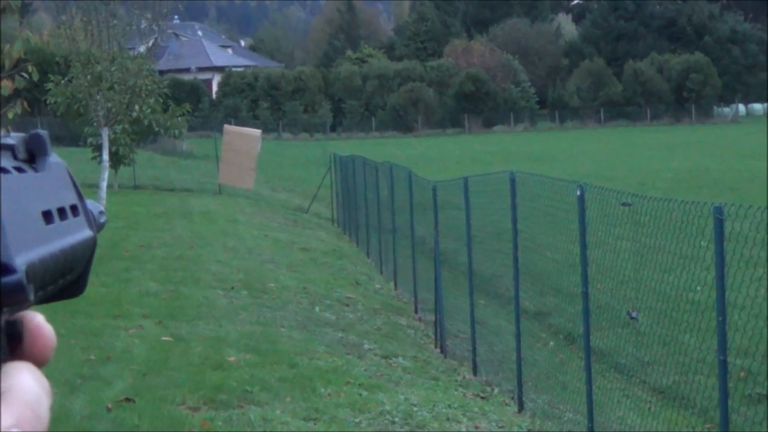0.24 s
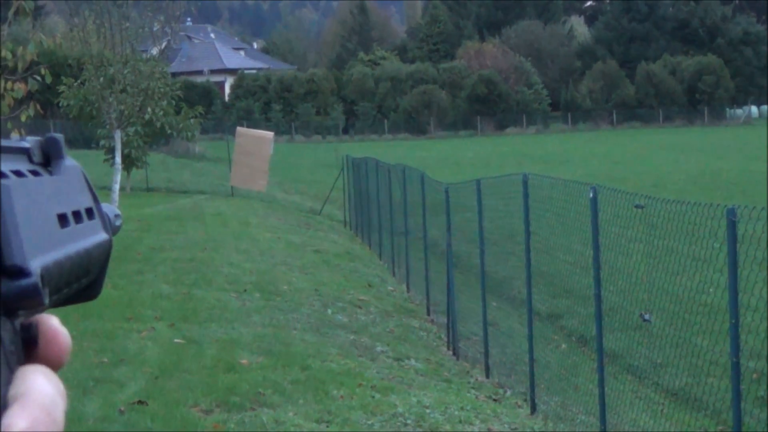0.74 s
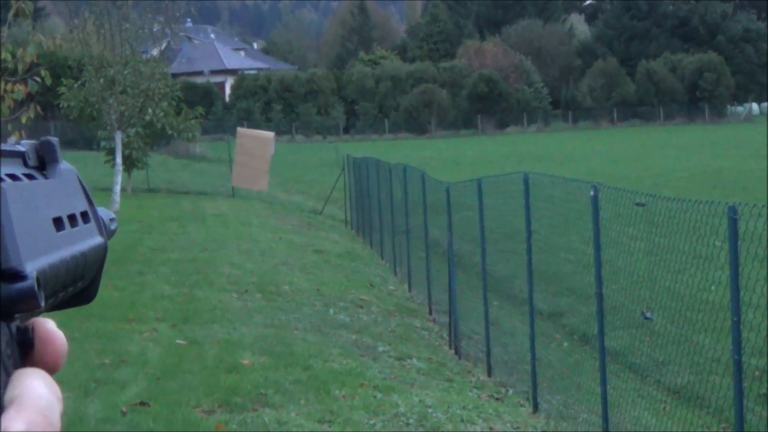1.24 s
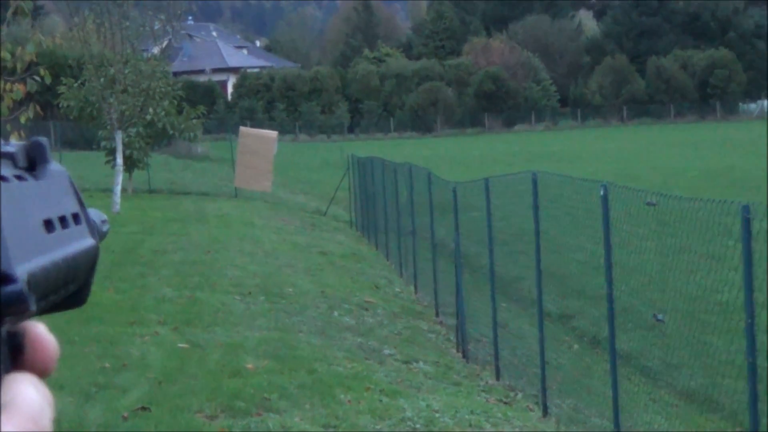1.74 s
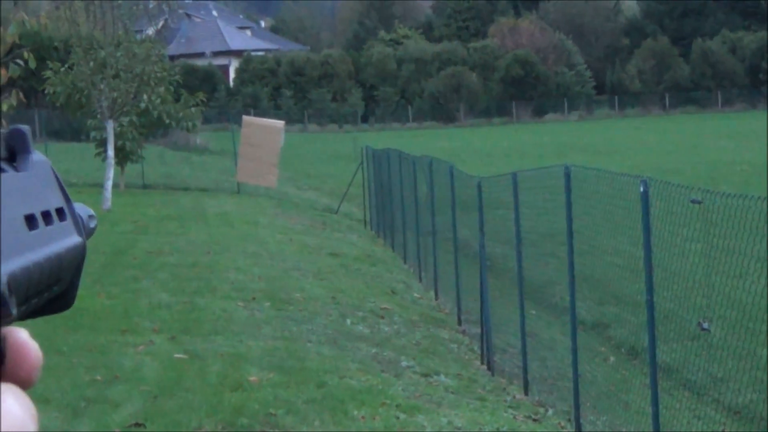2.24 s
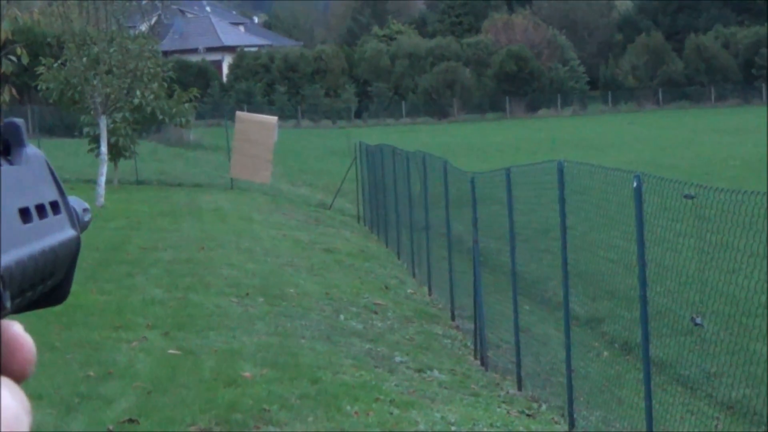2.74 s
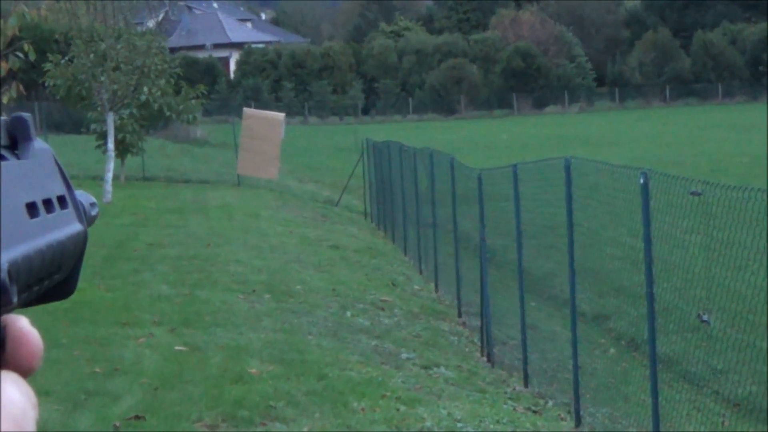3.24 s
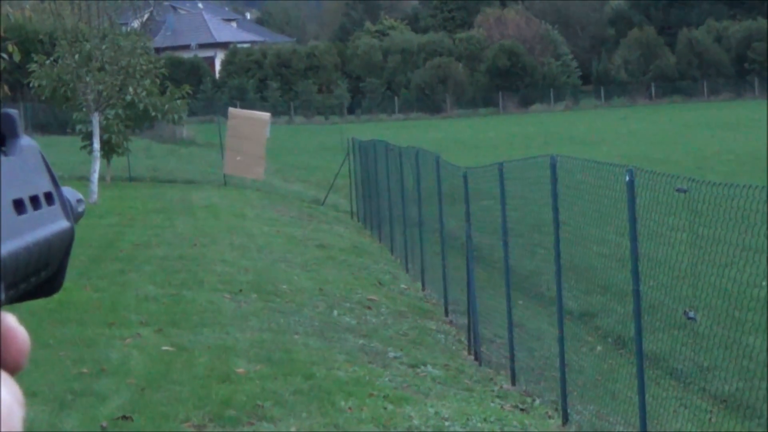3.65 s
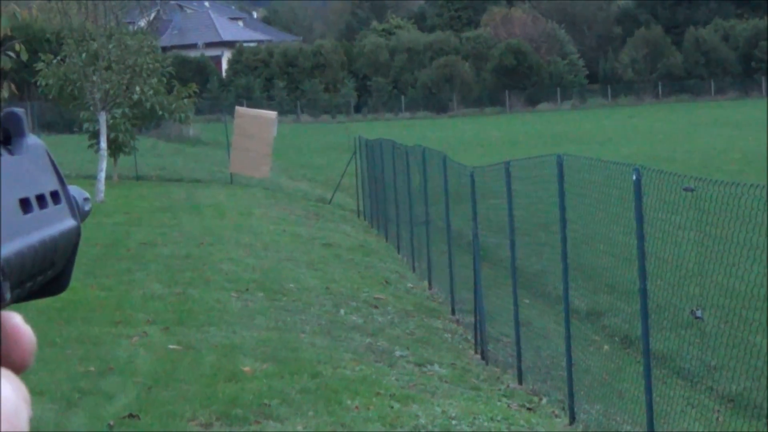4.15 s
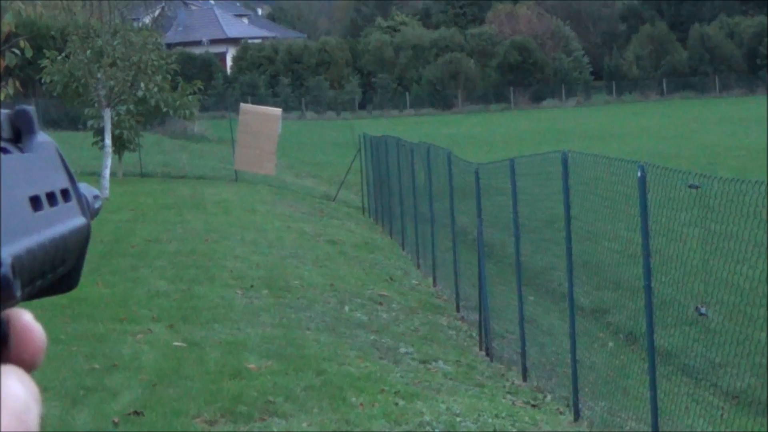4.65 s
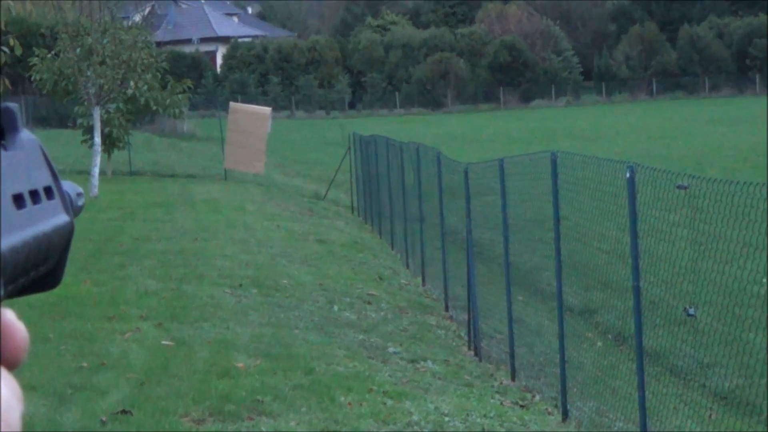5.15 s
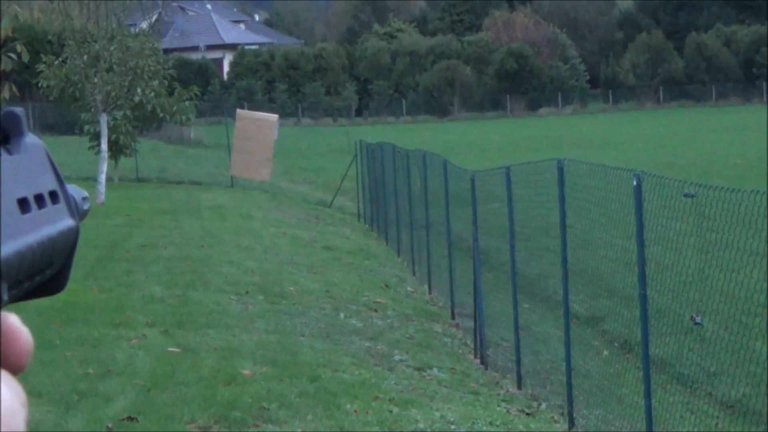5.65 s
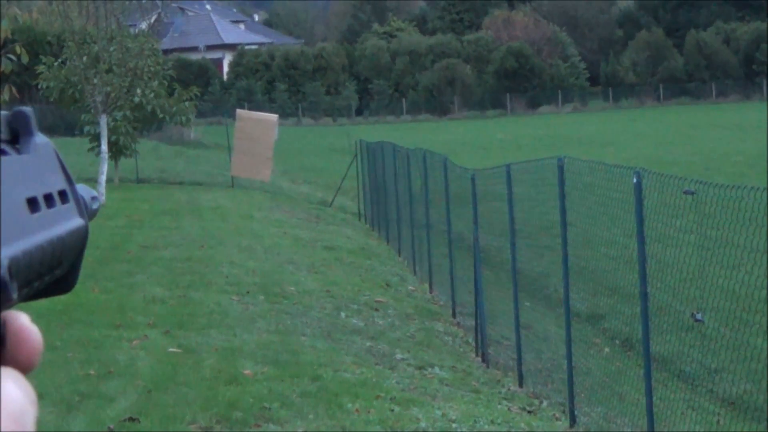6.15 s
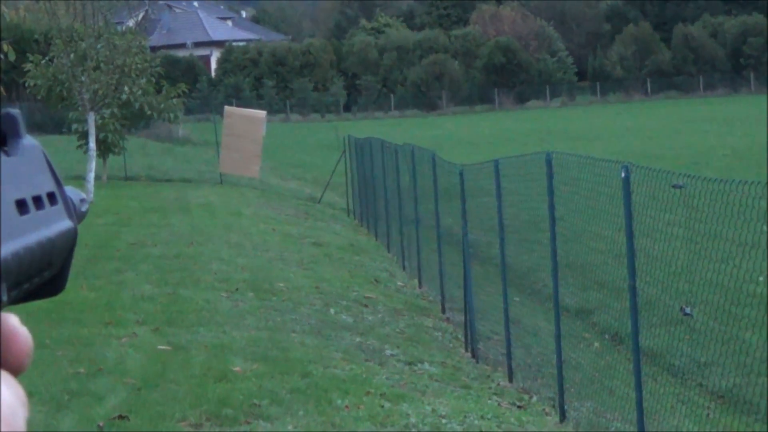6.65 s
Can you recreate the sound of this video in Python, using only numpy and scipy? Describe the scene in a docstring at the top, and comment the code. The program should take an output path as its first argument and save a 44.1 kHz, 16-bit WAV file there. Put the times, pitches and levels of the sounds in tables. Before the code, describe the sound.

Close stereo pickup with the gun louder on the left: two isolated airsoft shots, then a brisk run of separately triggered ones. A tiny motor whirs up, the piston slams dry and sharp, the spring hums briefly and the gears rattle to a stop with small metallic ticks. Soft far traffic surrounds it, dipping after loud shots; fence and ground add only a faint tail.

```python
"""Far traffic hums on an open lawn, with two faint steady electronic tones; a trigger clicks.
An electric airsoft gun, close on the left, fires two lone shots, then a quick series, with clicks between.
Each shot: the motor winds up and its gears whine, the piston is let go and slams, its spring hums,
and the train rattles to a halt, with a latch tick after some shots; fence and ground add a faint tail.
The recorder turns its gain down after loud sounds and slowly lets it rise again."""
import sys
import numpy as np
from scipy import signal
from scipy.fft import rfft, irfft
from scipy.io import wavfile
from scipy.ndimage import uniform_filter1d

SR = 44100
rng = np.random.default_rng(int(sys.argv[2]) if len(sys.argv) > 2 else 0)


def store_pcm(level_fs):
    """Save levels as 16-bit WAV."""
    pcm = np.round(np.clip(level_fs, -1, 1) * 32767).astype(np.int16)
    wavfile.write(sys.argv[1], SR, np.atleast_2d(pcm).T)


N = 303849

# The shots. Each row: piston slam in seconds, strength in relative dB, wind-up stretch (factor),
# run-down stretch (factor), moment the slack is taken up in seconds before the slam.
SHOTS = [(0.8424, 5, 1.055, 0.98, 0.062), (1.9969, 4, 1.004, 1.1, 0.082), (2.9537, 3.5, 1.0, 1.09, 0.076),
         (3.2046, 3, 1.025, 1.02, 0.071), (3.4379, 3.5, 1.06, 1, 0.068), (3.6763, 4, 1.0, 1.03, 0.065),
         (3.9013, 3, 1.0, 1, 0.083), (4.1306, 2.5, 0.99, 1.05, 0.069), (4.348, 4, 1.027, 0.99, 0.061),
         (4.576, 4, 1.01, 0.96, .066), (4.8265, 3.5, 1.03, 0.92, .07), (5.1062, 3, 1.02, 0.99, 0.063),
         (5.3684, 3.5, 1.01, 1.01, 0.0704), (5.6105, 5, 0.99, 0.97, 0.067), (5.8338, 4, 1.02, 0.95, .068),
         (6.0573, 3.5, 1.05, 0.95, .068), (6.3018, 3, 1.053, 0.97, 0.069), (6.5443, 2, 0.97, 1.01, .068),
         (6.8026, 2.5, 1.026, 0.97, 0.072)]


def amp(db):
    """dB to gain."""
    return 10 ** (np.asarray(db) / 20)


def rms_one(x):
    """Scale to rms 1."""
    return x / np.sqrt(np.mean(x ** 2))


def at_hz(points):
    """Read a spectrum table at every FFT bin, along log frequency."""
    hz = np.maximum(np.fft.rfftfreq(N, 1 / SR), 1)
    table_hz, values = np.array(points).T
    return np.interp(np.log(hz), np.log(table_hz), values)


def humps(table):
    """Resonance humps in dB at every FFT bin."""
    hz = np.fft.rfftfreq(N, 1 / SR)
    return sum(db / (1 + (2 * (hz - centre) / width) ** 2) for centre, width, db in table)


def colour(x, gain):
    """Filter by a gain per FFT bin."""
    return irfft(rfft(x) * gain, N)


def drift(rate_hz):
    """Slow chance, rms 1: noise through two equal low-pass poles, settled for a second first."""
    r = np.exp(-2 * np.pi * rate_hz / SR)
    noise = rng.standard_normal(N + SR)
    return rms_one(signal.lfilter([1], [1, -2 * r, r * r], noise)[SR:])


def ring(clicks, hz, t60):
    """A unit click sets off a decaying sine of starting height 1."""
    r, w = amp(-60 / (t60 * SR)), 2 * np.pi * hz / SR
    return signal.lfilter([0, np.sin(w)], [1, -2 * r * np.cos(w), r * r], clicks + 1e-18)


def traffic():
    """Far road hum: smooth noise, more alike in both channels in the bass than the mids, gently patchy."""
    # Each row: Hz, dB per Hz (relative).
    hum_spectrum = [(15, -76), (25, -50), (77, -20), (131, -24), (224, -23), (293, -15), (373, -15.5),
                    (427, -13), (673, -7), (833, -5), (2000, -17), (3200, -24), (5570, -36), (11800, -40.5),
                    (15000, -43)]
    # Resonances in the hum. Each row: centre in Hz, width in Hz, height in dB.
    hum_humps = [(460, 210, 4), (1026, 420, 5.5), (1520, 180, 3.5), (2110, 220, 5), (15500, 300, 22)]
    # Each row: Hz, left-right likeness (0 to 1).
    likeness = [(60, 0.92), (180, 0.92), (550, 0.9), (1650, 0.6), (4970, 0.65), (15000, 1)]
    # Swell of the road before its flutter. Each row: seconds, level of the mid part in dB rms.
    swell = [(0, -35), (.7, -33.5), (1.3, -31.5), (1.901, -30.5), (2.5, -34), (3, -32.5), (5, -35),
             (6.9, -36.5)]
    alike = np.clip(at_hz(likeness), 0, 1)
    gain = amp(at_hz(hum_spectrum) + humps(hum_humps))
    mid = colour(rng.standard_normal(N), gain * np.sqrt(1 + alike))
    side = colour(rng.standard_normal(N), gain * np.sqrt(1 - alike))
    level_db = np.interp(np.arange(N) / SR, *np.transpose(swell)) + 0.8 * drift(6.0)
    return amp(level_db) * np.array([mid + side, mid - side]) / np.std(mid)


def latch():
    """Dry steel ticks as the gears coast: a click and a softer second one 0.7 ms later ring the metal."""
    # Each row: start in seconds, click height in relative dB, ring in Hz.
    ticks = [(0.9095, 3, 8100), (2.0404, -20, 3180), (2.0862, -4, 8800), (3.5095, -6, 8740),
             (4.643, 1, 7940), (5.1796, 3.5, 7600), (5.435, 2, 7160), (5.672, 6, 8010), (5.8855, 2, 8110),
             (6.111, 4.5, 7990), (6.3603, 1, 8000), (6.6116, 3.5, 8410)]
    out = np.zeros(N)
    for s, peak_db, hz in ticks:
        tick = np.zeros(2000)
        tick[[0, 30]] = amp(peak_db), amp(peak_db - 9)
        out[round(s * SR):][:len(tick)] += ring(tick, hz, 0.0014)
    return out


def trigger():
    """Each click builds up as a short scrape, snaps and rattles out, in three parts of the spectrum."""
    # Each row: time in seconds (the snap comes 0.98 ms later), level in relative dB, brightness in dB.
    clicks = [(0.538, -17, 11), (0.9293, -14.5, 8), (0.952, -10.5, 1), (0.9636, -25, 3), (1.712, -14, 5),
              (1.8894, -39, -12), (2.101, -9.5, -2.5), (2.1201, -22, 6), (2.158, -27, 5), (3.0745, -7, -1),
              (3.3315, -6.5, -1), (3.5734, -4.5, -1.5), (3.8153, -6.5, 1), (4.0191, -10, 1.5),
              (4.246, -9, 2), (4.4763, -7, 4), (4.7045, -5, 0.5), (4.9433, -9.5, 21), (4.968, -6.5, -3),
              (4.996, -16.5, 6), (5.2204, -7, 1.5), (5.4856, -7, 3), (5.7304, -6, 0), (5.9465, -22, 11),
              (5.963, -6, 2), (6.1946, -5.5, -0.5), (6.4201, -9.5, -1), (6.6533, -11.5, -3),
              (6.671, -20.5, 9)]
    # Each row: low edge in Hz, high edge in Hz, gain in dB, share of the brightness (factor),
    # rise in dB per ms, snap t60 in seconds, after-rattle in dB, after-rattle t60 in seconds.
    click_bands = [(442, 1130, 8.5, -0.52, 5, 0.018, -7, 0.052),
                   (1310, 3120, 5, 0.075, 6.5, 0.0076, -12, 0.066),
                   (4540, 10340, 1, 0.22, 7.5, 0.0023, -11.5, 0.034)]
    build_s = .005   # the lever scrapes this long before it snaps
    bounce_s, bounce_db = 0.0068, -5   # the lever knocks back once, dull: lowest band only
    crack_db = 7   # one hard contact at the snap, over the chatter
    t = np.arange(int(.08 * SR)) / SR - build_s   # seconds from the snap
    low_hz, high_hz, gain_db, share, rise_db, snap, tail_db, tail = np.transpose(click_bands)[:, :, None]
    scrape = amp(1000 * rise_db * np.minimum(t, 0))
    decay = amp(-60 * t / snap) + amp(tail_db - 60 * t / tail)
    fade = np.where(t < 0, scrape, decay)
    fade[0] += amp(bounce_db - 60 * np.abs(t - bounce_s) / snap[0])
    parts = np.zeros((3, N))
    for s, level_db, bright_db in clicks:
        at = round((s + 0.00098 - build_s) * SR)
        chatter = rng.standard_normal(fade.shape)
        chatter[:, np.argmax(t >= 0)] = -amp(crack_db)
        parts[:, at:at + len(t)] += chatter * fade * amp(level_db + gain_db + share * bright_db)
    edges = zip(low_hz[:, 0], high_hz[:, 0])
    bands = [signal.butter(2, edge, "band", fs=SR, output="sos") for edge in edges]
    return sum(signal.sosfilt(band, part + 1e-18) for band, part in zip(bands, parts))


def spring():
    """Every slam restarts the main spring's low modes; they are damped as the gears come to rest."""
    # Each row: mode in Hz, level in relative dB, t60 in seconds.
    modes = [(147, -30.5, 0.13), (285.2, -34.5, 0.26), (427.7, -25.5, 0.29)]
    start_s = -0.00403   # from the slam
    t = np.arange(int(.15 * SR)) / SR   # seconds from the start of the hum
    swell = np.minimum(t / 0.0073, 1)
    damped = np.clip((0.095 - t) / 0.011, 0, 1)
    out = np.zeros(N + SR)
    for slam, shot_db, *_ in SHOTS:
        hum = np.zeros(len(t))
        for hz, level_db, t60 in modes:
            mode_db = shot_db + level_db + 2.4 * rng.standard_normal() - 60 * t / t60
            hum += amp(mode_db) * np.sin(2 * np.pi * hz * t)
        out[round((slam + start_s) * SR):][:len(t)] += hum * swell * damped
    return out[:N]


def contacts():
    """The same chain of ringing blows around each slam; force and timing vary a little."""
    # Metal and plastic contacts in one cycle. Each row: seconds from the slam before stretching,
    # click height in dB before the shot strength, ring in Hz, t60 in seconds.
    blows = [(-.0805, -26.5, 7900, 0.0059), (-.0217, -16, 1490, 0.0068), (-.0197, -7.5, 1330, 0.0021),
             (-.0153, -22, 6900, 0.016), (-.0096, -4.5, 5570, 0.0018), (-.0055, -7, 4770, 0.0011),
             (-.0009, -5, 790, 0.0098), (-.0003, -3, 2630, 0.0023), (.0043, -7, 7200, 0.0017),
             (-.0152, -31, 10300, .002), (-.0095, -9, 9600, .0015), (-.0053, -24, 11000, .0015),
             (.0042, -30, 10600, 0.00087), (0.026, -36, 3960, 0.0056), (0.0279, -11, 620, .02),
             (0.03, -15.5, 866, 0.045), (.035, -14.5, 1301, 0.0093), (-.018, -39, 156, 0.11),
             (-.019, -18, 84, 0.051), (-.012, -27.5, 338, 0.088)]
    out, shots = np.zeros(N), np.array(SHOTS)
    for s, peak_db, hz, t60 in blows:
        # early blows follow the wind-up, late ones the run-down, those near the slam neither
        stretch = shots[:, 3] if s > .01 else shots[:, 2] if s < -.03 else 1
        timing, force = rng.standard_normal((2, len(shots)))
        at = np.round((shots[:, 0] + s * stretch + 0.00013 * timing) * SR).astype(int)
        inside = at < N
        clicks = np.zeros(N)
        clicks[at[inside]] = -amp(peak_db + shots[:, 1] + 0.5 * force)[inside]
        out += ring(clicks, hz, t60)
    return out


def cycle_time():
    """Seconds from the nearest slam, stretched per shot, and that shot's strength in dB."""
    slack_db, slack_s = -3.5, 0.0027   # softer until the slack is taken up, then full load within this time
    shots, t = np.array(SHOTS), np.arange(N) / SR
    k = np.searchsorted((shots[1:, 0] + shots[:-1, 0]) / 2, t)
    since = t - shots[k, 0]
    slack = np.clip(-(since + shots[k, 4]) / slack_s, 0, 1)
    stretch = np.where(since > 0, shots[k, 3], shots[k, 2])
    return since / stretch, shots[k, 1] + slack_db * slack


def whine(hz, orders, rough_db):
    """Teeth meeting at a tooth rate: partials that waver a little in pitch and strength."""
    phase = 2 * np.pi * np.cumsum(hz * (1 + .025 * drift(150.4))) / SR
    out = np.zeros(N)
    for multiple, db in orders:
        partial = np.sin(multiple * phase + rng.uniform(0, 2 * np.pi))
        out += amp(db + rough_db * drift(290)) * partial
    return out


def rattle(spectrum, per_s, spread_db):
    """Loose teeth knock at random, with uneven force, into two unrelated parts of the resonant shell."""
    # Shell resonances. Each row: centre in Hz, width in Hz, height in dB.
    shell = [(606, 82, 4.5), (830, 166, 7.5), (2380, 400, 6), (4110, 110, 0.5), (5750, 170, 3),
             (8650, 890, -1)]
    force_db = spread_db * np.minimum(rng.exponential(1, (2, N)), 4)
    force = amp(force_db) * rng.choice([-1, 1], (2, N))
    knocks = (rng.random((2, N)) < per_s / SR) * force
    return rms_one(colour(knocks, amp(at_hz(spectrum) + humps(shell))))


def gear_train():
    """Whine and rattle follow one cycle at every shot; returns the shared and the left-right differing sound."""
    # Gear speed over a cycle. Each row: seconds from the slam, rack and pinion tooth rates in Hz.
    speed = [(-.088, 449.4, 801), (-.076, 597, 1298), (-.058, 1054, 2393), (-.039, 1465, 2697),
             (-.022, 1547, 2750), (.0, 1700, 2689), (.026, 1400, 2632), (.055, 950, 1700),
             (.085, 799.3, 800), (.11, 762, 527.5)]
    # Rattle over a cycle, swelling at wind-up and at the rebound.
    # Each row: seconds from the slam, dull level in relative dB, bright level in relative dB.
    rattle_levels = [(-.084, -69, -58), (-.08, -24.5, -35.5), (-.068, -17.5, -30), (-.058, -17, -21.5),
                     (-.036, -19.5, -20), (-.017, -21, -17.5), (-.012, -20.5, -23), (.021, -23, -24),
                     (0.025, -19, -18), (0.048, -18.5, -20.5), (.07, -21.5, -28), (.085, -29.5, -35),
                     (.11, -44, -61)]
    # Rack whine partials. Each row: multiple of the tooth rate, level in relative dB.
    rack_orders = [(1, -0.6), (2, -13.5), (3, -13)]
    # Shell rattle. Each row: Hz, dB per Hz (relative).
    dull = [(35, -59), (60, -52), (211, -18), (411, -10), (600, -5), (815, -3), (1100, -2.5), (1500, -2),
            (1840, -5), (2430, -8), (5000, -16.5), (6500, -25), (11000, -120)]
    # Steel rattle. Each row: Hz, dB per Hz (relative).
    bright = [(1470, -31), (2500, -6.5), (2980, -6), (3950, -3), (5010, -15.5), (5620, -4.5), (6340, -8),
              (8810, -3.5), (10600, -7), (12000, -15.5), (13300, -13.5), (14600, -41.5), (15500, -21)]
    likeness = 0.93   # left-right likeness of the knocks

    since, shot_db = cycle_time()
    speed_s, *speeds = np.transpose(speed)
    rack_hz, pinion_hz = [np.interp(since, speed_s, rate) for rate in speeds]
    level_s, *levels = np.transpose(rattle_levels)
    dull_db, bright_db = [np.interp(since, level_s, level) for level in levels]
    start, end = level_s[0], level_s[-1]
    running = amp(shot_db) * (since > start) * (since < end)

    # the rack is fully loaded, slips off, idles, then bites again over a short while (s from slam)
    loaded, release, rebound, re_engage = -0.028, -0.02, 0.037, 0.059
    stages = [start, loaded, release - .002, release + 0.0016, rebound, rebound + re_engage]
    # whine in dB over the dull rattle at each stage; the rack's grows as the spring is squeezed
    rack_db = dull_db + np.interp(since, stages, [-11, 3.5, 3.5, -12, -12, -4])
    pinion_db = dull_db + np.interp(since, stages, [-9.5, -9.5, -9.5, -19, -19, -4.5])
    tones = amp(rack_db) * whine(rack_hz, rack_orders, 3.7)
    tones += amp(pinion_db) * whine(pinion_hz, [(0.99, 0)], 5.0)

    knocks = amp(dull_db + 2.05 * drift(49)) * rattle(dull, 7000, 2.75)
    knocks += amp(bright_db + 2.13 * drift(150)) * rattle(bright, 9000, 3.85)
    shared = running * (np.sqrt(2) * tones + np.sqrt(likeness) * knocks[0])
    return shared, running * np.sqrt(1 - likeness) * knocks[1]


def near_left(shared, differing):
    """Two microphones get the gun at other levels and phases; fence and ground return a short faint tail."""
    # Each row: Hz, left over right in dB.
    balance = [(60, 2), (130, 2), (290, 0), (640, 8), (1410, 8), (3100, 10), (6820, 4), (15000, -0.5)]
    # Each row: Hz, lead of the left in radians.
    lead = [(60, 0.3), (860, 0.84), (3600, -0.73), (8000, -0.3), (15000, 0.0)]
    lawn_db, lawn_t60_s = -15.5, 0.29
    t = np.arange(int(.3 * SR)) / SR
    tails = rng.standard_normal((2, len(t))) * amp(-60 * t / lawn_t60_s)
    tails = amp(lawn_db) * tails / np.linalg.norm(tails[0])
    half = amp(at_hz(balance) / 2) * np.exp(.5j * at_hz(lead))   # half the difference to each side
    direct = np.array([colour(shared + differing, half), colour(shared - differing, 1 / half)])
    return direct + signal.fftconvolve(shared[None], tails, axes=1)[:, :N]


def scene():
    """Gun near the left, road all round; the small gun body radiates little bass."""
    gears, differing = gear_train()
    gun = near_left(gears + contacts() + spring() + trigger() + latch(), differing)
    bass_cut = signal.butter(2, 230, "high", fs=SR, output="sos")
    return signal.sosfilt(bass_cut, gun) + traffic()


def record(dry):
    """Faint electronic tones, gain control with a slow release, clipped peaks, steep top cut."""
    # Steady electronic tones ahead of the gain control. Each row: Hz, level in dB rms.
    whistle = [(15625, -57), (7812.5, -74)]
    t = np.arange(N) / SR
    wet = dry + sum(np.sqrt(2) * amp(db) * np.sin(2 * np.pi * hz * t) for hz, db in whistle)
    power = uniform_filter1d(np.mean(wet ** 2, axis=0), size=882)   # over 20 ms
    level_db = 10 * np.log10(power + 1e-12)
    cut_db = np.maximum(level_db + 18.5, 0) * .5   # half of what exceeds -18.5 dB
    release_db = 4.33 * t   # dB per second
    held_db = np.maximum.accumulate(cut_db + release_db) - release_db
    smooth_cut_db = signal.lfilter([.002], [1, -.998], np.maximum(held_db, 0))
    wet = wet * amp(-smooth_cut_db)
    top_cut = signal.cheby2(12, 70, 16700, fs=SR, output="sos")   # 70 dB down from 16.7 kHz
    return signal.sosfilt(top_cut, np.clip(wet, -1, 1))


dry = scene()
out = record(dry)
store_pcm(out)
```